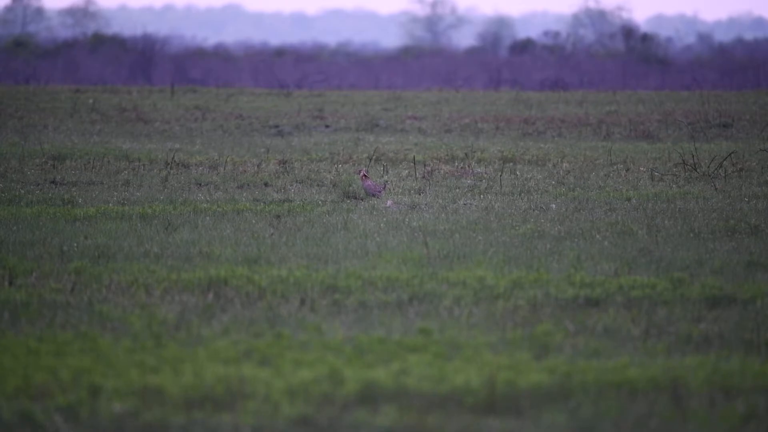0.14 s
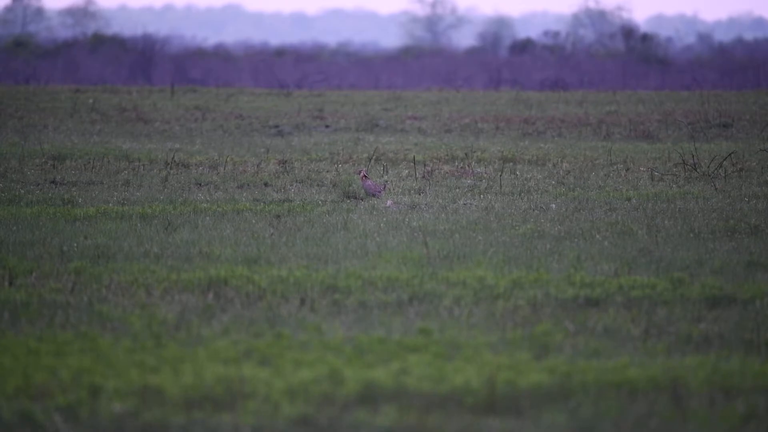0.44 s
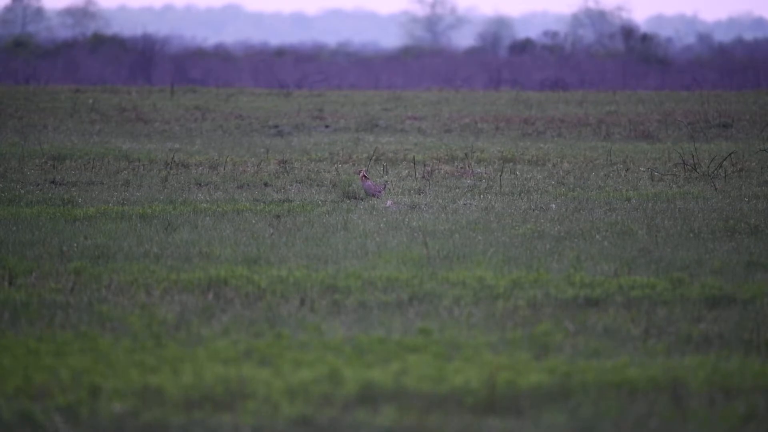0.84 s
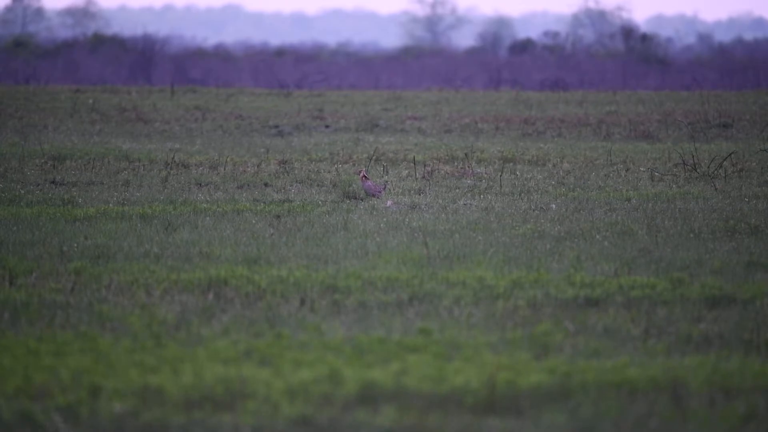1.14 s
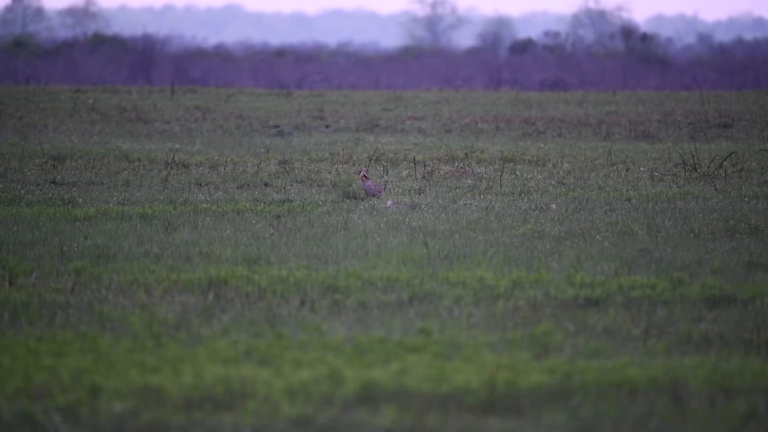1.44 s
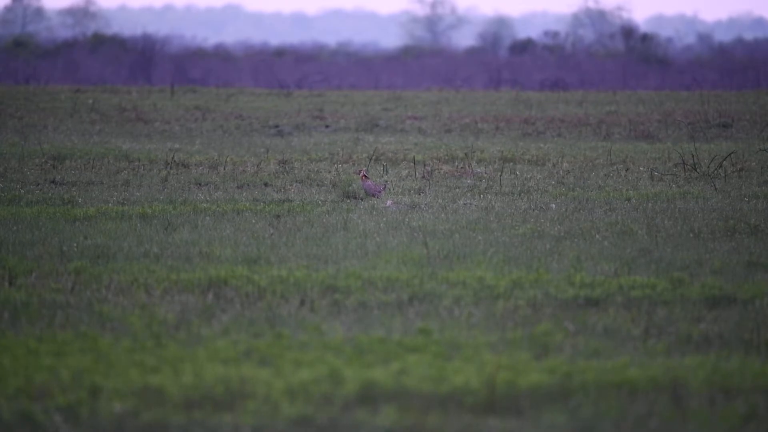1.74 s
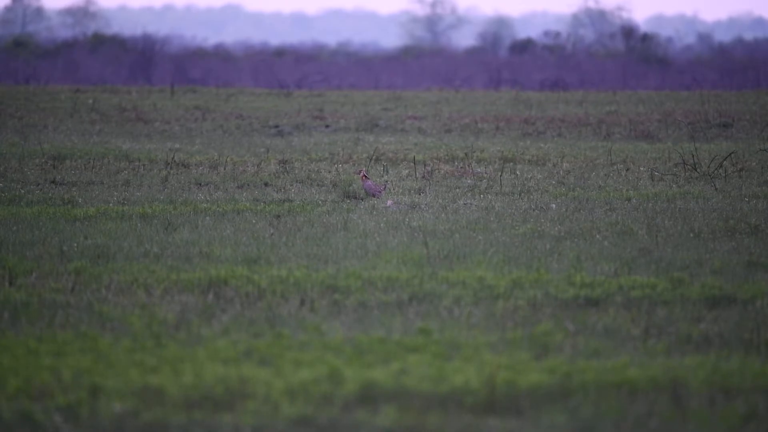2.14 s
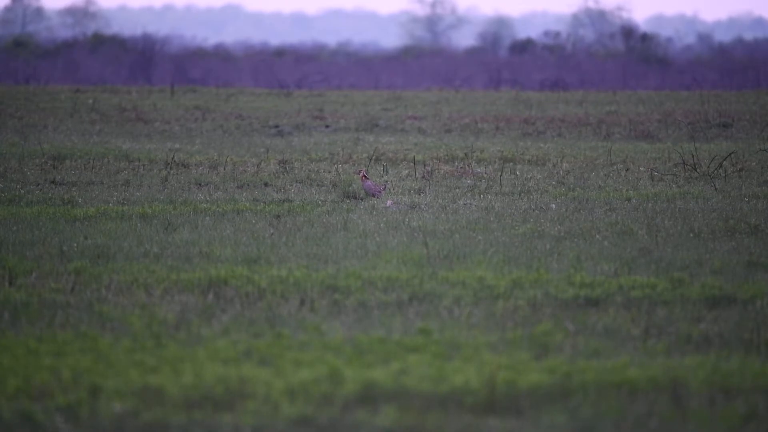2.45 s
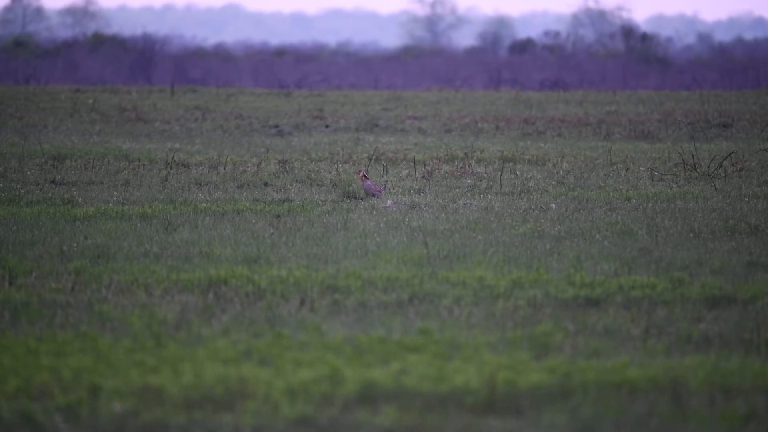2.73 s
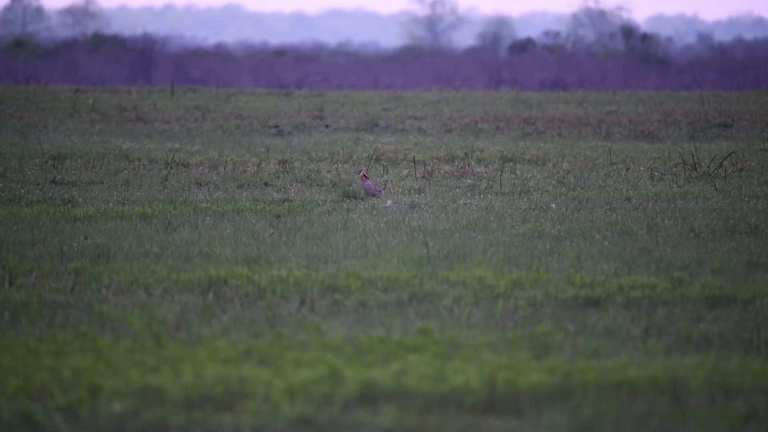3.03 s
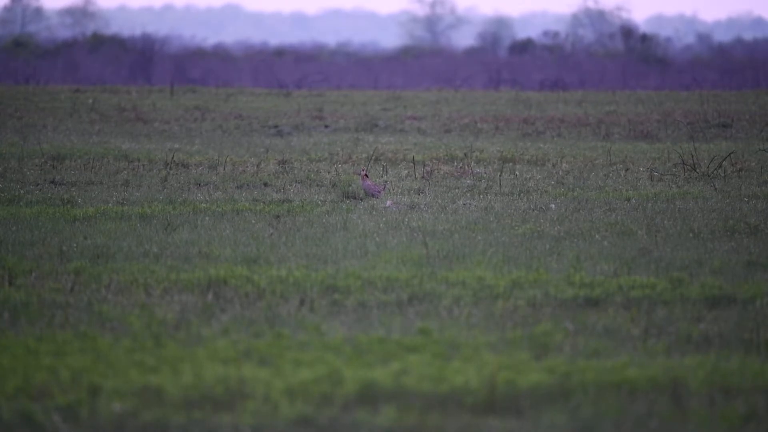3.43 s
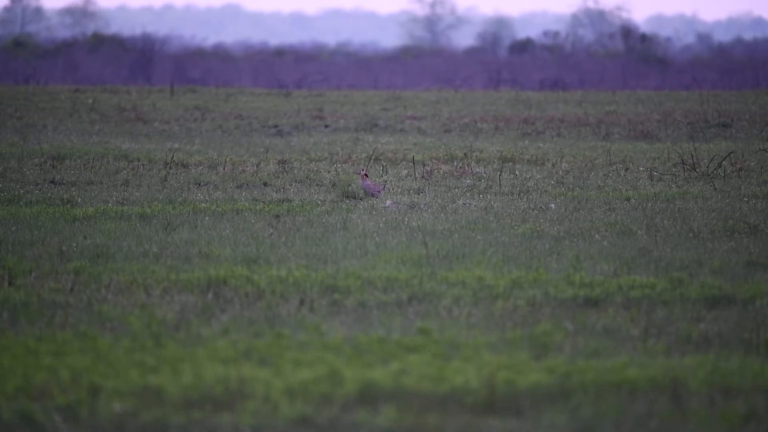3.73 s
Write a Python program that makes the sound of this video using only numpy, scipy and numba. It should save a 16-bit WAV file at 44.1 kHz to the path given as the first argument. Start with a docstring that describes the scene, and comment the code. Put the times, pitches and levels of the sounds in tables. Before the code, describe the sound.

Wind buffets a microphone hard in an open field, with faint bird calls and cricket trills behind

```python
"""Open field, about 3.9 s, on a camera microphone with two ports: filtered noise makes each port's own gusts.
They strike hard from the start, ease from about 1.5 s and return near 2.8 s, with slaps as dying swings.
Far off, a cricket trills throughout in short sliding strokes. At 0.24 s a wader yelps upwards (gliding
harmonics through a throat), with sliding sine whistles of a songbird from 0.33 s; the yelps return at 1.5 s
and 1.8 s. A faint echo follows them over soft noise hiss, and a fast limiter bends the loud swings."""
import sys
import numpy as np
from scipy import signal
from scipy.fft import rfft, irfft
from scipy.io import wavfile
from scipy.ndimage import uniform_filter1d
from numba import njit

SR = 44100
rng = np.random.default_rng(int(sys.argv[2]) if len(sys.argv) > 2 else 0)


def store_wav(level_fs):
    """Save 16-bit WAV to argv[1]."""
    pcm = np.round(np.clip(np.atleast_2d(level_fs), -1, 1) * 32767)
    wavfile.write(sys.argv[1], SR, pcm.T.astype(np.int16))


def voltage_ratio(decibels):
    """Convert decibels (scalar or array-like) to amplitude ratios, 20 dB per decade."""
    exponent = np.asarray(decibels, float) / 20
    return 10 ** exponent


N = 171108  # samples


def unit(x):
    """Scale to rms 1."""
    return x / np.sqrt(np.mean(x ** 2))


@njit
def svf(x, hz, k):
    """State-variable filter with moving corner hz and damping k: low, band and high outputs."""
    y, b, l = np.empty((3, len(x))), 0., 0.
    for i in range(len(x)):
        g = np.tan(np.pi * hz[i] / SR)
        v = (b + g * (x[i] - l)) / (1 + g * (g + k))
        low = l + g * v
        b, l = 2 * v - b, 2 * low - l
        y[0, i], y[1, i], y[2, i] = low, k * v, x[i] - k * v - low
    return y


def walk(rate):
    """Random levels held 1 / rate s and slewed twice; spread 1."""
    k = int(SR / rate)
    held = np.repeat(rng.standard_normal(N // 200), k)[:N]
    return unit(uniform_filter1d(uniform_filter1d(held, k), k))


def gate(t, length, edge):
    """Smooth on and off."""
    return np.sin(np.pi / 2 * np.clip(np.minimum(t, length - t) / edge, 0, 1)) ** 2


def wind(gusts):
    """Eddies on one port: rumble flutters and brightens with the gust, under fine spray and over slow sway."""
    eddy_hz, eddy_damping = 173.5, 1.053  # top of the rumble in a -17.5 dB gust, before its wander
    brighten = 0.16  # dB of rumble top per dB of gust
    flutter_db, flutter_per_s, wander_db, wander_per_s = 3.5, 95, 2.5, 60
    low_cut_hz = 76.7  # of the capsule
    spray_db, spray_rise = -44, 0.39  # relative to a -20 dB gust; extra dB per dB, up to a 0 dB gust
    spray_pole = 0.95  # darker towards 1
    sway_db, sway_hz = -34, 55.4  # stays between gusts

    one = np.ones(N)
    gust = np.interp(np.arange(N) / SR, *np.array(gusts, float).T)
    gust = gust + flutter_db * walk(flutter_per_s)
    top = eddy_hz * voltage_ratio(brighten * (gust + 17.5) + wander_db * walk(wander_per_s))
    top = np.clip(top, 40, 2000)
    noise = rng.standard_normal((3, N))

    rumble = svf(noise[0], top, eddy_damping)[0]
    rumble = svf(rumble, top, eddy_damping)[0]
    rumble = svf(rumble, 2.79 * top, 1.51)[0]
    rumble = rumble / np.sqrt(top)  # a wider band is no louder
    rumble = unit(svf(rumble, low_cut_hz * one, 1.404)[2])

    spray = unit(signal.lfilter([1], [1, -spray_pole], noise[2]))
    spray = spray * voltage_ratio(spray_db + spray_rise * np.minimum(gust + 20, 20))

    sway = svf(noise[1], sway_hz * one, 0.83)[1]
    sway = unit(svf(sway, sway_hz * one, 0.92)[0])
    return voltage_ratio(gust) * (rumble + spray) + voltage_ratio(sway_db) * sway


def slaps():
    """Eddies bursting on a port: a steep front, push or pull, then dying swings, each at its own pace."""
    # bursts: [t/s, level at the louder port/dB, left minus right/dB]
    bursts = [(0.087, -8.5, -23), (0.179, 6, -33), (0.2212, -9.5, 20), (0.3046, -7.5, 21),
              (0.924, -11.5, -17.5), (0.956, -10.5, -37), (0.988, -11, -6.5), (1.008, -15, -8.5),
              (1.405, -6, -8), (1.413, 2.5, 16), (1.44, -13.5, 5), (2.3, -26.5, -19), (2.829, -16.5, 18),
              (3.161, -6.5, -17), (3.493, -14.5, -5), (3.647, -7, -11.5)]
    decay_s, swing_hz, front_s = 0.0034, 396.4, 0.00022  # pace scales swing_hz by 0.7 to 1.3
    out, t = np.zeros((2, N)), np.arange(N) / SR
    for (s, db, pan_db), (push, pace) in zip(bursts, rng.random((len(bursts), 2))):
        i = slice(int(s * SR) - 400, int(s * SR) + 1200)
        u = t[i] - s
        decay = np.exp(np.minimum(-u, 4 * u) / decay_s)  # builds four times faster than it dies
        swings = decay * np.cos(2 * np.pi * swing_hz * (0.7 + 0.6 * pace) * np.maximum(u, 0))
        front = np.tanh(u / front_s)
        port_db = db + np.minimum(0, [[pan_db], [-pan_db]])  # only the farther port is turned down
        out[:, i] += np.sign(push - 0.5) * voltage_ratio(port_db) * front * swings
    return out


def wader():
    """Gliding harmonics through a throat resonance; a second wavering membrane beats on the high held note."""
    # pitch and level track of each yelp: [t/s, f/Hz, level before the throat/dB]
    yelps = [
        [(.24, 385, -62), (.27, 399, -46.5), (.295, 361, -57.5), (.32, 485, -53), (.352, 585, -52),
         (.375, 635, -52), (.42, 784, -56.5), (.55, 817, -55.5), (.68, 800, -55.5)],
        [(1.53, 822, -71), (1.59, 780, -67), (1.61, 667, -58), (1.625, 530, -56), (1.65, 500, -54),
         (1.67, 432, -60.5), (1.685, 386, -75.5)],
        [(1.84, 322.6, -69), (1.862, 374.4, -54.5), (1.882, 367.8, -58.5), (1.905, 476.4, -50),
         (1.93, 599, -56), (1.952, 768, -55), (2.03, 809, -52.5), (2.2, 819, -48.5), (2.3, 774, -53),
         (2.33, 745, -54.5), (2.347, 686, -48.5), (2.36, 564, -50), (2.41, 478, -54.5), (2.425, 450, -65)],
    ]
    throat_hz, throat_width_hz = 2170, 780
    beat_hz, beat_db, beat_from_hz = 500, -6.5, 680  # centre of the beat; full 80 Hz above beat_from_hz
    rasp_depth = 0.4  # hoarse haze around the partials

    out, t = np.zeros(N), np.arange(N) / SR
    beat = 2 * np.pi * np.cumsum(beat_hz * (1 + 0.15 * walk(90))) / SR
    k = np.arange(1, 10)[:, None]  # partial numbers
    for yelp in yelps:
        s, hz, db = np.array(yelp, float).T
        on = (t > s[0]) & (t < s[-1])
        pitch = np.interp(t[on], s, hz)
        partial_hz = k * pitch
        detune = (partial_hz - throat_hz ** 2 / partial_hz) / throat_width_hz
        throat = 1 / (1 + detune ** 2) ** 2
        turn = 2 * np.pi * k * np.cumsum(pitch) / SR
        # beat tones lie one and two beats below each partial
        under = np.sin(turn - beat[on]) + 0.53 * np.sin(turn - 2 * beat[on])
        under = under * voltage_ratio(beat_db) * np.clip((pitch - beat_from_hz) / 80, 0, 1)
        voice = (throat * (np.sin(turn) + under)).sum(axis=0)
        out[on] += voltage_ratio(np.interp(t[on], s, db)) * voice
    rasp = unit(uniform_filter1d(rng.standard_normal(N), size=50))
    return out * voltage_ratio(1.1 * walk(38.5)) * (1 + rasp_depth * rasp)


def songbird():
    """Pure whistled notes that slide in pitch and waver slightly in level."""
    # notes: [t/s, length/s, from f/Hz, to f/Hz, level/dB]
    whistles = [(0.33, .078, 3490, 3370, -67.5), (0.424, 0.074, 3350, 3300, -59.5),
                (0.475, 0.063, 3320, 3050, -54), (0.523, .224, 3133, 2864, -47.5),
                (1.066, .033, 3980, 3780, -58), (1.099, 0.023, 3880, 3910, -62.5),
                (1.146, .072, 3070, 2950, -50.5), (1.359, 0.012, 2920, 2860, -53),
                (1.408, 0.1, 3090, 2970, -60.5), (2.742, 0.034, 2010, 2180, -53)]
    out, t = np.zeros(N), np.arange(N) / SR
    for start, length, from_hz, to_hz, db in whistles:
        on = (t > start) & (t < start + length)
        u = t[on] - start
        turn = 2 * np.pi * (from_hz * u + (to_hz - from_hz) * u ** 2 / length / 2)
        out[on] += voltage_ratio(db) * gate(u, length, 0.008) * np.sin(turn)
    return out * voltage_ratio(1.5 * walk(23))


def cricket():
    """Trains of short wing strokes, each sliding down in pitch."""
    # trills: [t/s, length/s, level/dB, mid-stroke f/Hz]
    trills = [(.008, 0.465, -56, 4620), (0.678, 0.53, -56, 4590), (1.524, .41, -58, 4580),
              (2.121, .61, -54, 4514), (2.884, 0.71, -54.5, 4515), (3.781, 0.12, -56, 4430)]
    strokes_per_s, slowing = 69.5, 0.0044  # rate at first; each wait grows by this share of the first
    jitter_s, scatter_db = 0.0008, 1.5
    stroke_s, fall_hz, octave_db = 0.0096, 380, -21.5  # mean length, pitch fall across it, second partial

    out, t = np.zeros(N + SR), np.arange(1000) / SR
    count = np.arange(80)
    for start, length, db, hz in trills:
        chance = rng.standard_normal((80, 3))
        at = start + count * (1 + slowing * count / 2) / strokes_per_s
        at = at + jitter_s * chance[:, 0]
        for s, (_, size, span) in zip(at[at < start + length], chance):
            turn = 2 * np.pi * (hz * t + fall_hz * (t / 2 - t ** 2 / stroke_s / 2))
            tone = np.sin(turn) + voltage_ratio(octave_db) * np.sin(2 * turn)
            shape = gate(t, stroke_s * (1 + 0.041 * span), 0.0023)
            i = max(int(s * SR), 0)
            out[i:i + 1000] += voltage_ratio(db + scatter_db * size) * shape * tone
    return out[:N]


def place(x, lag_s, pan_db):
    """A distant sound reaches the right port lag_s later; pan_db is left minus right."""
    f = np.arange(N // 2 + 1) * SR / N
    late = irfft(rfft(x) * np.exp(-2j * np.pi * f * lag_s), N)
    return np.array([x * voltage_ratio(pan_db / 2), late * voltage_ratio(-pan_db / 2)])


def echo(x):
    """Scattered return from the tree line and the ground: a decaying noise tail for each port."""
    echo_db, t60_s = -16, 0.43
    t = np.arange(SR // 2) / SR
    tail = rng.standard_normal((2, SR // 2)) * voltage_ratio(-60 * t / t60_s)
    tail = tail / np.sqrt((tail ** 2).sum(axis=1, keepdims=True))
    return voltage_ratio(echo_db) * signal.fftconvolve(x, tail, axes=1)[:, :N]


def field():
    """Smooth hiss, nearly independent at the two ports, with a small common part in the lows and low middle."""
    # hiss spectrum before scaling: [f/Hz, level per Hz/dB]
    spectrum = [(240, -28), (450, 2.5), (1200, -13.5), (4030, -19.5), (15500, -24)]
    hiss_db, shared, shared_top_hz = -58, 0.085, 1100  # shared: common share of the power
    hz, db = np.array(spectrum, float).T
    f = np.arange(N // 2 + 1) * SR / N + 1  # 1 Hz up, to keep the log finite
    share = shared / (1 + (f / shared_top_hz) ** 4)
    noise = rfft(rng.standard_normal((3, N)))
    ports = np.sqrt(share) * noise[0] + np.sqrt(1 - share) * noise[1:]
    colour = voltage_ratio(np.interp(np.log(f), np.log(hz), db))
    return voltage_ratio(hiss_db) * unit(irfft(colour * ports, N))


def scene():
    """Wind on each port over the distant field."""
    # eddy pressure on each port, before flutter: [t/s, level/dB]
    left_gusts = [(0.0, -33.5), (0.065, -21.5), (0.11, 1.5), (0.135, -17.5), (0.18, -15), (0.224, -10),
                  (0.284, -14.5), (0.309, -6), (0.339, -18), (0.479, -18), (0.504, -25), (0.534, -12),
                  (0.619, -13), (0.654, 1), (0.698, -24.5), (0.723, -5.5), (0.748, -21), (0.768, -12),
                  (0.813, -12), (0.833, -17.5), (0.888, -23.5), (0.933, -7), (0.963, -24.5), (0.983, -16),
                  (1.013, -13), (1.078, -33.5), (1.197, -13.5), (1.247, -17.5), (1.282, -22.5),
                  (1.392, -23), (1.417, -6), (1.437, -19), (1.467, -9), (1.497, -30), (1.532, -11),
                  (1.596, -48.5), (1.686, -14.5), (1.741, -29.5), (1.771, -15.5), (1.821, -42),
                  (1.851, -29.5), (1.916, -38.5), (1.946, -30.5), (2.01, -22), (2.06, -30), (2.09, -18),
                  (2.125, -32.5), (2.175, -15.5), (2.245, -26), (2.275, -28.5), (2.355, -17),
                  (2.514, -43.5), (2.594, -23), (2.759, -38), (2.829, -9.5), (2.868, -31.5), (2.958, -38),
                  (3.093, -37), (3.168, -13.5), (3.218, -18.5), (3.307, 0.5), (3.377, -18), (3.447, -9.5),
                  (3.477, -26.5), (3.537, -15.5), (3.697, -15.5), (3.722, -7.5), (3.821, -25),
                  (3.851, -5.5), (3.876, -17)]
    right_gusts = [(0.0, -19.0), (0.02, -8.5), (0.07, -19), (0.095, -3.0), (0.13, -26.5), (0.145, -27),
                   (0.185, -1.5), (0.21, -29), (0.269, -35), (0.309, -22.5), (0.354, -14), (0.399, -25.5),
                   (0.479, -14.5), (0.524, -26.5), (0.594, -15.5), (0.644, -23.5), (0.668, -5),
                   (0.693, -21.5), (0.818, -17), (0.863, -24.0), (0.928, -9), (0.948, -15), (1.043, -8.5),
                   (1.102, -24.5), (1.187, -8.5), (1.217, 1.5), (1.367, -20), (1.407, 4), (1.437, -22.5),
                   (1.497, -17), (1.546, -10.5), (1.636, -34), (1.666, -27.5), (1.701, -30), (1.776, -12.0),
                   (1.916, -29), (2.005, -20), (2.065, -24.5), (2.2, -10), (2.3, -18), (2.33, -25),
                   (2.429, -18.5), (2.464, -33.5), (2.649, -28), (2.734, -50), (2.834, -20), (3.053, -33.0),
                   (3.078, -15.5), (3.133, -25.0), (3.163, -6), (3.203, -28.5), (3.223, -5), (3.263, -12),
                   (3.293, 7), (3.312, -11.5), (3.327, -6.5), (3.347, -23), (3.432, 0.5), (3.472, -16.0),
                   (3.517, -5), (3.612, -12.5), (3.652, -9), (3.687, -20.5), (3.737, -1.5), (3.751, -10.5),
                   (3.771, 5.5), (3.806, -22), (3.831, 5), (3.851, -12), (3.876, -2)]
    near = np.array([wind(left_gusts), wind(right_gusts)]) + slaps()
    far = place(wader(), 0.00005, 0)
    far = far + place(songbird(), 0.00022, -6.5)
    far = far + place(cricket(), 0.00033, -8)
    return near + far + echo(far) + field()


@njit
def follow(x, attack, release):
    """Envelope that rises fast and falls slowly."""
    out, e = np.empty(len(x)), 0.
    for i in range(len(x)):
        e += (abs(x[i]) - e) * (attack if abs(x[i]) > e else release)
        out[i] = e
    return out


def limiter(dry):
    """A very fast limiter bends each swing above its ceiling; the channels pull on each other a little."""
    ceiling, ratio, link = 0.37, 14, 0.49  # link: exponent on the other channel's gain
    attack_s, release_s = 0.00007, 0.001
    envelope = np.array([follow(x, 1 / (attack_s * SR), 1 / (release_s * SR)) for x in dry])
    gain = np.minimum(ceiling / (envelope + 1e-9), 1) ** (1 - 1 / ratio)
    return dry * gain * gain[::-1] ** link


def top_cut(x):
    """Nothing passes above the cut-off."""
    return signal.sosfilt(signal.butter(12, 15830, fs=SR, output="sos"), x)


def record(dry):
    """The microphone's limiter, then the hiss of its electronics."""
    self_noise = voltage_ratio(-63.5) * rng.standard_normal(dry.shape)
    mix = limiter(dry) + self_noise
    return top_cut(mix)


dry = scene()
out = record(dry)
store_wav(out)
```